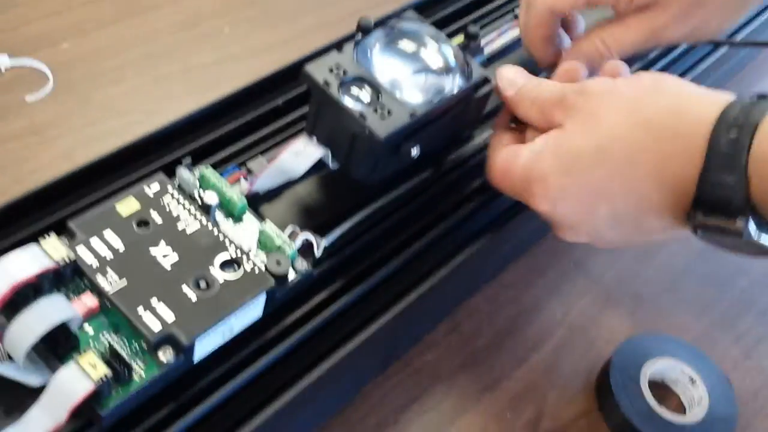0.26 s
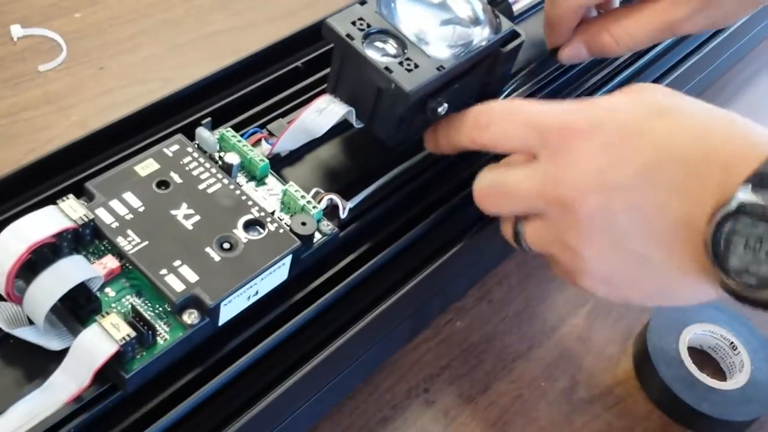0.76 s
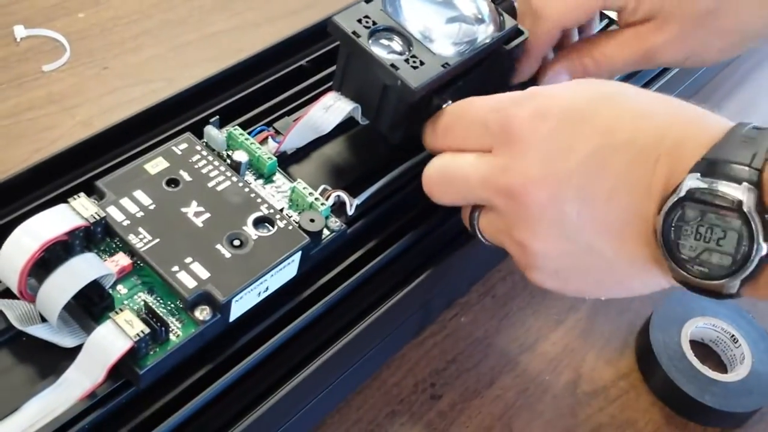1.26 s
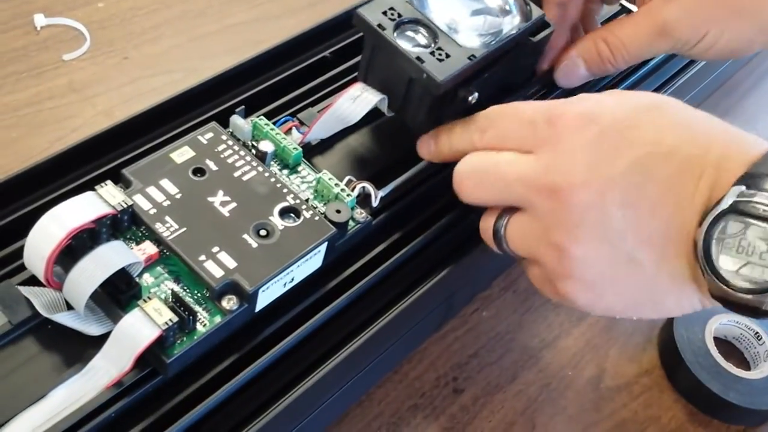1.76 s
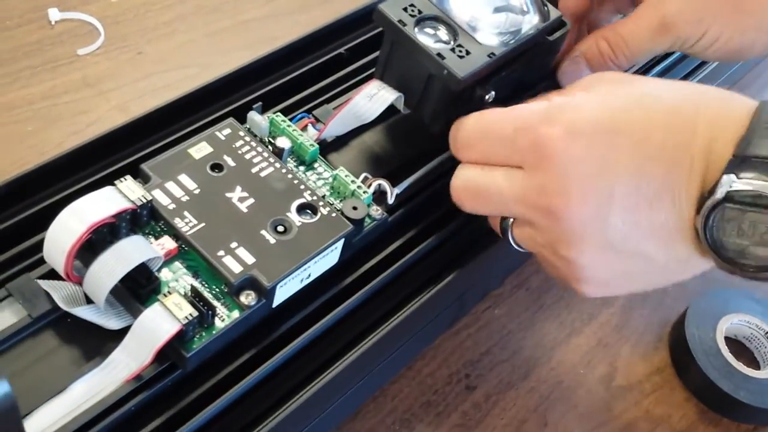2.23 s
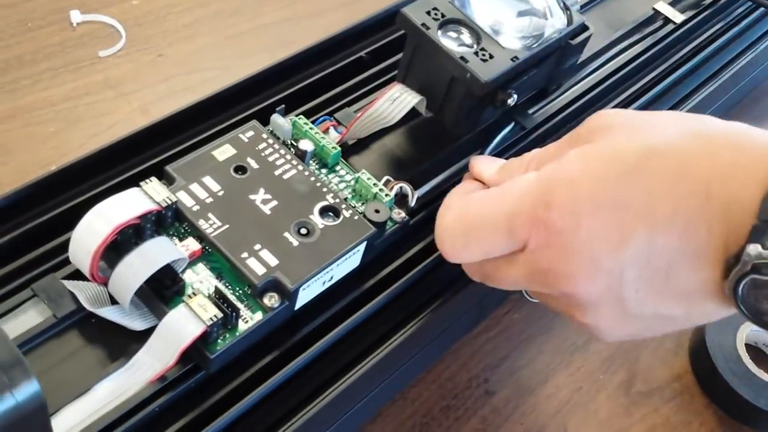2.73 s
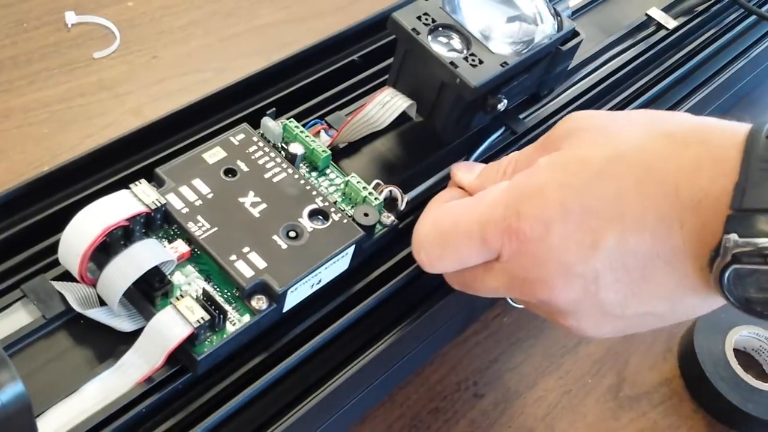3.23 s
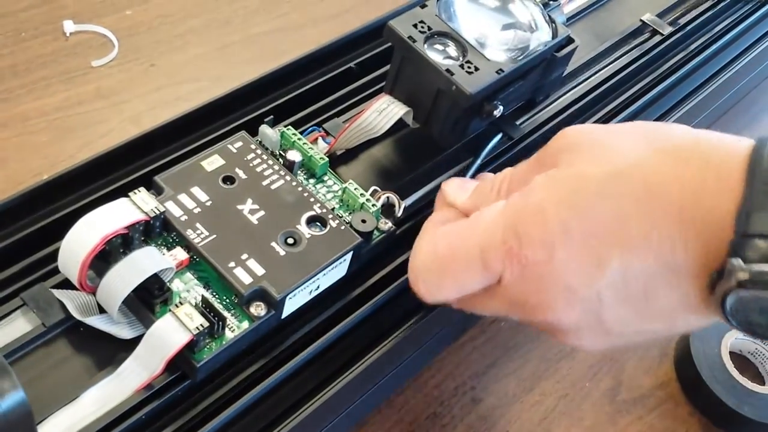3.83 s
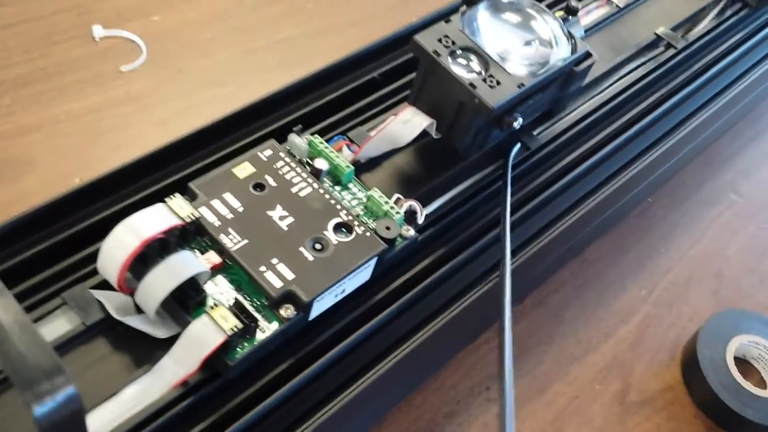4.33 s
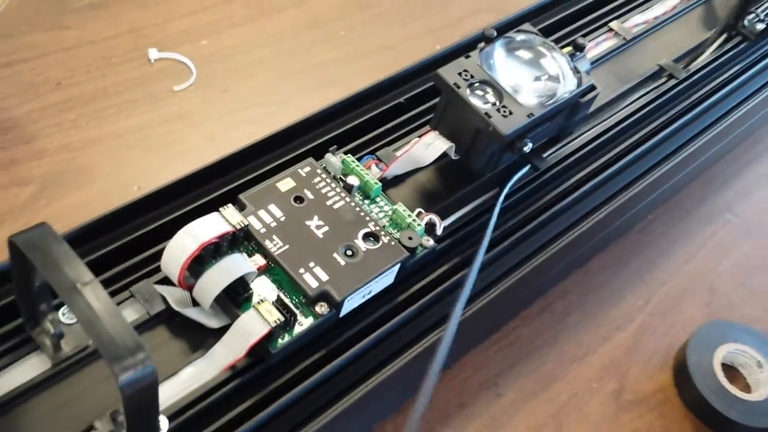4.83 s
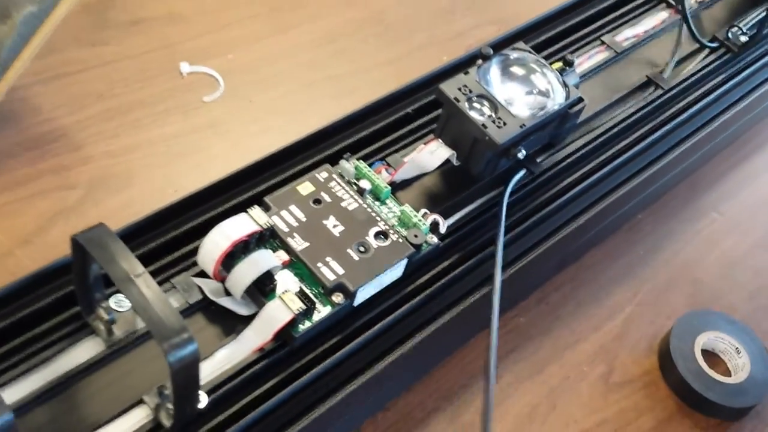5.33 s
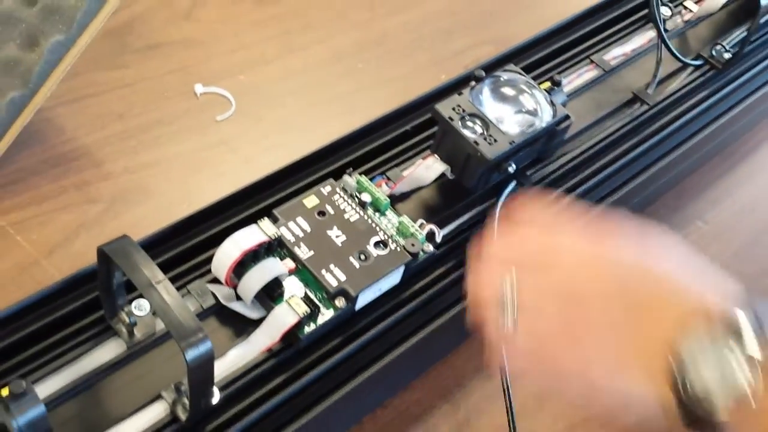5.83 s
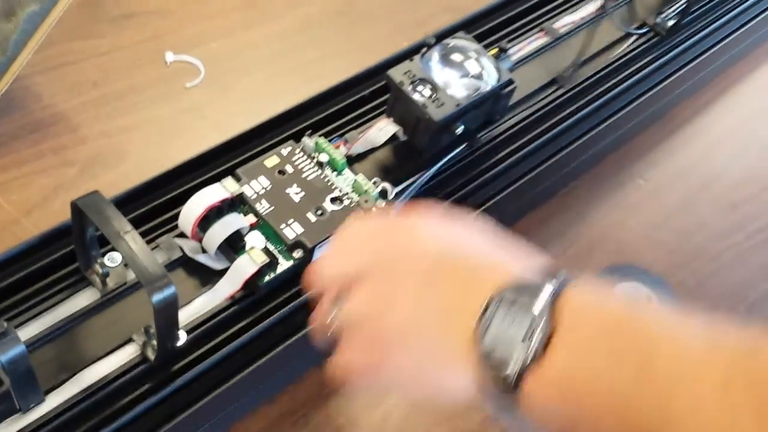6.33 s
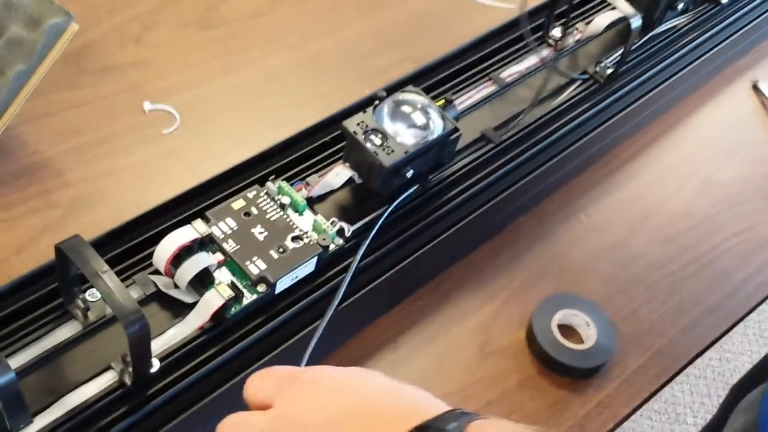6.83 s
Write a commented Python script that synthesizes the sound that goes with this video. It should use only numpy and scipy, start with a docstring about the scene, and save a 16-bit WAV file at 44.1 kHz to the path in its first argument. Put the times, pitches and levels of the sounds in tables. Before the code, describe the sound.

Close in a small room, a thin cable rubs in uneven strokes along a hollow metal channel. Knocks, dull tocks and plastic snaps crowd the first two and a half seconds, peaking in a bright clack. Softer sliding through fingers follows, then ringing knocks near five seconds, a strong scrape, and a hard knock with the cable dragging on the tabletop. Faint mains hum and ventilation stay underneath.

```python
"""Cable fed along an aluminium channel

A thin cable is fed by hand along a long channel on a table: filtered noise and stick-slip clicks follow slow strokes.
Knocks are short noise bursts that ring sine modes of the channel; plastic clips snap and small fittings tock.
The table drums and booms with filtered slips and noise, fingers swish on the jacket.
Mains hum, low ventilation rumble and faint hiss fill the small room."""
import sys
import numpy as np
from scipy import signal
from scipy.io import wavfile

SR = 44100
rng = np.random.default_rng(int(sys.argv[2]) if len(sys.argv) > 2 else 0)


def store_pcm(level_fs):
    """Save levels as 16-bit WAV."""
    pcm = np.round(np.clip(level_fs, -1, 1) * 32767).astype(np.int16)
    wavfile.write(sys.argv[1], SR, np.atleast_2d(pcm).T)


N = 312668
TIME = np.arange(N) / SR

# Pushes and pulls of the cable. Each row: moment of full speed in seconds, speeding up in seconds,
# slowing down in seconds, friction level in dB (each layer trims it), low scrape and hiss in dB against the friction.
STROKES = [(0.0, 0.028, 0.081, -36, 1, -8.5), (0.26, 0.12, 0.03, -54.5, 3, 5),
           (0.44, 0.22, 0.16, -47, -5, -2), (0.608, 0.1, 0.22, -54, 4.5, 1),
           (0.82, 0.13, 0.26, -45, -0.5, -1.5), (1.18, 0.31, 0.3, -56.5, 3.5, 1.5),
           (1.795, 0.1, 0.076, -43.5, -8, 3), (1.93, 0.32, 0.17, -45.5, 5.5, -0.5),
           (2.095, 0.065, 0.035, -49, -16, 0), (2.36, 0.38, 0.5, -61, 7, 5.5),
           (3.41, 0.18, 0.091, -50.5, 0.5, 3.5), (3.56, 0.16, 0.29, -46.5, -3, 2),
           (3.711, 0.081, 0.26, -55, 0.5, 5.5), (4.12, 0.087, 0.07, -61.5, 7, 2.5),
           (4.39, 0.23, 0.15, -51.5, -2.5, 3), (4.6, 0.12, 0.23, -46.5, -3, -2),
           (4.72, 0.1, 0.3, -52, -3, 2.5), (4.96, 0.26, 0.19, -61, 10, 5.5),
           (5.539, 0.034, 0.093, -52, -6, 9), (5.721, 0.19, 0.21, -45, -7, 0.5),
           (5.816, 0.16, 0.096, -37.5, -22, -3), (6.02, 0.86, 0.14, -56, -1, -3),
           (6.36, 0.14, 0.2, -73, 11, 19), (6.56, 0.057, 0.025, -53.5, -1, 8.5),
           (6.73, 0.18, 0.44, -45.5, 2, -2.5), (6.855, 0.036, 0.065, -54, 0, 11),
           (6.965, 0.05, 0.036, -55.5, -16, 13.5), (7.07, 0.065, 0.15, -59.5, -7, 8)]
# Steady creep of the held cable beneath the strokes: friction level in dB, low scrape and hiss in dB against it.
CREEP = (-70.5, 7.7, 6.8)
SPEED_POWER = 2.25   # the rub's amplitude grows as this power of the speed
# Brief flares as the jacket snags: how many per second, size against the rub in dB, t60 in seconds
SNAGS_PER_S, SNAG_DB, SNAG_T60_S = 37, 1, 0.021
# Spectrum of the rub. Each row: frequency in Hz, relative density in dB per Hz.
RUB_COLOUR = [(200, 0.5), (500, -3.5), (750, 4.5), (1100, -4), (1750, 0), (2400, -5.5), (3000, -19.5),
              (3900, -2.5), (4600, -15), (5400, -14), (6400, -5.5), (8000, -14), (10500, -27),
              (14500, -29.5)]
# Damped resonances of the groove the cable runs in. Each row: frequency in Hz, width in Hz, relative level in dB.
GROOVE_MODES = [(860, 98, -7), (973, 39, 3.5), (1265, 26, 4), (1670, 55, 2), (1780, 87, -2),
                (4200, 160, -17), (6140, 160, -9.5)]
# Contact of the cable with a rail's edge. Each row: time in seconds, share of the friction from 0 to 1.
EDGE_CONTACT = [(0.1, 0.03), (0.4, 0.69), (2.35, 0.37), (2.5, 0.3)]
# Resonances of that edge. Each row: frequency in Hz, width in Hz, relative level in dB.
EDGE_MODES = [(4080, 530, -0.5), (4670, 190, 3)]
# Cable drawn through the fingers. Each row: time in seconds, share of the friction from 0 to 1.
FINGER_GRIP = [(3.25, 0.6), (3.4, 1), (4.7, 1), (4.85, 0.6), (5.5, 0.05), (5.8, 0), (6.6, 0.7)]
# Spectrum of the finger swish. Each row: frequency in Hz, relative density in dB per Hz.
FINGER_COLOUR = [(850, 2), (1200, -3.5), (1600, -10), (2800, -34), (6400, -13.5), (11000, -27),
                 (14500, -23.5)]

# Blows on the channel. Each row: start in seconds, level in dB before the layer's trim, thud in dB,
# brightness in dB, t60 of the burst in seconds, free ringing in dB against the level, place where it lands.
KNOCKS = [(0.003, -33, 3, -5, 0.036, 5, "lamp"), (0.122, -41.5, 15, 2.5, 0.11, -23, "lamp"),
          (0.216, -48.5, 15, -4.5, 0.25, 3, "lamp"), (0.368, -60, 26, 24.5, 0.14, -8, "lamp"),
          (0.498, -38, 11.5, 1, 0.08, -15, "lamp"), (0.602, -43, 13, 3, 0.1, -8, "middle"),
          (0.722, -41, 20.5, -3, 0.13, -25, "middle"), (0.783, -44, 8, -11, 0.08, -10, "middle"),
          (0.836, -33.5, 14.5, -7, 0.11, -12, "middle"), (1.084, -40.5, -22, 0, 0.088, -16, "lamp"),
          (1.117, -62, 34, -16, 0.061, -22, "middle"), (1.24, -30.5, 8, -4.5, 0.13, -11, "middle"),
          (1.252, -29.5, 3.5, -2.5, 0.082, -23, "middle"), (1.327, -43, 27.5, -20, 0.1, -25, "middle"),
          (1.471, -31.5, 6, 4, 0.064, -7, "lamp"), (1.695, -42, 12, 5.5, 0.046, -10, "middle"),
          (1.986, -35, 13.5, -9, 0.053, -8, "middle"), (2.185, -28, 8.5, 1.5, 0.12, 5.5, "middle"),
          (2.4539, -19.5, 11, 9.5, 0.099, -2, "lamp"), (2.567, -26, -0.5, -5.5, 0.048, -2.5, "lamp"),
          (2.958, -49, 5, 0.5, 0.092, -12, "middle"), (3.103, -49.5, 10, 1.5, 0.29, -19, "middle"),
          (3.317, -33, 0, -10.5, 0.037, -21, "middle"), (3.684, -43, 18.5, 3, 0.091, -19, "middle"),
          (3.883, -52, 8, 6, 0.035, -17, "middle"), (4.7655, -24, -6.5, -17.5, 0.08, -7, "lamp"),
          (4.862, -42.5, -12, 0, 0.097, 10, "end"), (4.967, -22, 0.5, -13, 0.11, -2.5, "end"),
          (4.978, -31.5, 9, -9, 0.1, -25, "end"), (5.038, -43, 13, 1, 0.16, 10.5, "end"),
          (5.388, -34, 8, 5, 0.1, 9, "end"), (5.397, -33.5, 5, -0.5, 0.21, 5.5, "end"),
          (5.437, -42.5, 13.5, 3, 0.2, 3, "end"), (5.492, -43.5, 10, 7.5, 0.087, 0, "end"),
          (6.03, -35, 3.5, -8, 0.058, -15, "end"), (6.135, -51.5, 11, 6, 0.14, -16, "end"),
          (6.524, -50.5, 0, -1, 0.24, 17.5, "graze"), (6.6088, -15.5, -2.5, -17, 0.061, -14, "graze"),
          (6.616, -25, 9.5, -13, 0.1, -28, "middle"), (6.644, -43, 5, -0.5, 0.08, 6.5, "graze"),
          (6.709, -30.5, -8, -21, 0.08, 1, "graze"), (6.773, -32, 1, -23, 0.051, 3.5, "graze"),
          (6.94, -56, -5, 6, 0.1, 13, "graze"), (6.969, -54, -6, 3, 0.073, 12, "graze")]
# Names of the places: beside the lamp, mid-channel, at the far end, the cable grazing a rail.
PLACES = ["lamp", "middle", "end", "graze"]
# Spectrum of a knock. Each row: frequency in Hz, relative density in dB per Hz.
KNOCK_COLOUR = [(200, -16), (450, -12), (600, -12), (730, -3.5), (1000, 1), (1500, 4.5), (2600, -2.5),
                (2950, -10.5), (3900, -4.5), (4400, -9.5), (6300, -8.5), (7700, -16.5), (10000, -23.5),
                (14500, -37)]
# Free modes of the channel. Each row: frequency in Hz, t60 in seconds, then relative level in dB
# when struck beside the lamp, in the middle, at the far end, and when the cable grazes a rail.
RAIL_MODES = [(735, .12, -2, -4, -20, -30), (862, .3, -14, -13, -14, -22), (1010, .15, -6, -3, -13, -20),
              (1276, .13, -7, -6, -6, -18), (1482, .22, -8, -9, -9, -14), (1587, .28, -14, 0, -6, -12),
              (1615, .55, -28, -22, -9, -5), (1665, .52, -7, -18, -13, -20), (1725, .16, -11, 1, -9, -16),
              (1834, .48, -14, -20, -11, -13), (1986, .17, -12, -3, -12, -18),
              (2210, .36, -11, -19, -14, -9), (2374, .13, -8, -6, -10, -20), (2530, .14, -3, -7, -13, -22),
              (2600, .16, -6, -14, -6, -20), (3128, .25, -26, -22, -16, -26),
              (3321, .25, -24, -24, -21, -13), (3868, .2, -16, -15, -15, -24),
              (3988, .22, -14, -24, -20, -24), (4145, .24, -11, -19, -21, -26),
              (4565, .55, -29, -33, -17, -10), (4657, .65, -20.5, -36, -23, -21),
              (4943, .28, -15, -26, -16, -21), (5615, .38, -24, -35, -22, -18),
              (6250, .16, -13, -22, -20, -24), (7484, .3, -21, -31, -30, -30)]
# Weaker neighbours around each mode: spread in pitch as a share, relative level in dB, share of its t60
NEIGHBOUR_SPREAD, NEIGHBOUR_DB, NEIGHBOUR_T60 = 0.0503, -17, 0.98
# Blows that catch a small damped fitting. Each row: start in seconds, pitch in Hz, level in dB, t60 in seconds.
TOCKS = [(.724, 633, -38, 0.081), (1.252, 1037, -29.5, 0.073), (2.456, 2485, -24, 0.098),
         (2.57, 930, -32, 0.052), (2.696, 758, -44.5, 0.1), (4.769, 1298, -29.5, 0.09),
         (4.968, 1437, -24, 0.058), (5.388, 2590, -34, 0.19)]
TOCK_LOWER_RATIO, TOCK_LOWER_DB = .77, -8   # second mode: share of the pitch, relative level in dB
# Snaps of plastic clips. Each row: start in seconds, then lower and upper mode drive level in dB.
CLIP_SNAPS = [(.004, -33.5, -34), (0.122, -41, -43), (0.501, -42, -61), (1.084, -47, -46.5),
              (1.253, -27.5, -29.5), (1.4703, -30.5, -39), (1.55, -47.5, -42.5), (4.7678, -42, -35.5),
              (4.9665, -39.5, -37), (5.387, -36, -50), (5.436, -31, -40), (5.491, -34, -42),
              (5.947, -60, -47), (6.608, -40, -36)]
# Modes of a clip. Each row: frequency in Hz, width of the first filter pass in Hz.
CLIP_MODES = [(3950, 810), (6550, 750)]

# Slack cable dragging over the table top. Each row: time in seconds, level in dB.
DRAG = [(6.61, -39), (6.63, -36), (6.7, -44.5), (6.79, -44.5), (6.9, -42.5), (6.98, -58)]
# Resonances of the table top. Each row: frequency in Hz, width in Hz, relative level in dB.
TABLE_MODES = [(370, 90, 5.5), (670, 74, 3), (863, 44, 10.5), (1036, 56, 6), (1290, 140, 0),
               (1770, 540, -4)]
# Spectrum of the table under the channel. Each row: frequency in Hz, relative density in dB per Hz.
BOOM_COLOUR = [(80, -19), (120, 3.5), (160, 4), (200, -2.5)]

# Slow swell of the room tone. Each row: time in seconds, hum level in dB, rumble level in dB before its trim.
ROOM_SWELL = [(0.0, -47, -54), (2.43, -49.5, -53.5), (3.08, -52.5, -59), (4.93, -49, -53.5),
              (5.98, -47, -60), (7.09, -48, -56.5)]
# Spectrum of the ventilation rumble. Each row: frequency in Hz, relative density in dB per Hz.
RUMBLE_COLOUR = [(25, -20), (38, -4), (55, -9), (80, -7), (100, -8), (130, 1.5), (170, 0), (220, -13.5),
                 (300, -37), (450, -30)]
# Spectrum of the faint hiss. Each row: frequency in Hz, relative density in dB per Hz.
AIR_COLOUR = [(150, -30), (250, -1), (533, -9), (1980, -17), (2160, -8.5), (3130, -33), (6560, -17.5),
              (8740, -29), (13100, -22), (14000, -33)]
HUM_HZ, OVERTONE_DB, AIR_DB = 59, -13.5, -62.5
ROOM_T60_S, CUTOFF_HZ = 0.54, 14000


def from_db(db):
    """Decibels to gain."""
    return 10 ** (np.asarray(db) / 20)


def rms_one(x):
    """Scale to unit rms."""
    return x / np.sqrt(np.mean(x ** 2) + 1e-20)


def in_time(rows):
    """Each column of a curve at every sample."""
    s, *columns = np.transpose(rows)
    return [np.interp(TIME, s, column) for column in columns]


def at_hz(points, hz):
    """Read a spectrum on a log-frequency axis."""
    points = np.array(points)
    return np.interp(np.log(hz), np.log(points[:, 0]), points[:, 1])


def dying(t, t60):
    """Fall by 60 dB in t60."""
    return np.exp(-np.log(1000) * t / t60)


def drift(rate_hz, size=N):
    """Slow random wander of unit rms: noise through two equal one-pole lowpasses."""
    r = np.exp(-2 * np.pi * rate_hz / SR)
    noise = rng.standard_normal(size + SR // 4)   # the extra start lets the filter settle
    return rms_one(signal.lfilter([1], [1, -2 * r, r * r], noise)[-size:])


def bands(colour, count):
    """Noise split into bands that share unit power as the colour says: (centre Hz, band)."""
    edges = np.geomspace(colour[0][0], min(colour[-1][0], SR / 2 - 1), count + 1)
    centres = np.sqrt(edges[1:] * edges[:-1])
    power = from_db(at_hz(colour, centres)) ** 2 * np.diff(edges)
    white = rng.standard_normal((2, N))   # adjacent bands draw on different noise
    for k, hz in enumerate(centres):
        bandpass = signal.butter(2, edges[k:k + 2], "band", fs=SR, output="sos")
        band = signal.sosfilt(bandpass, white[k % 2])
        yield hz, rms_one(band) * np.sqrt(power[k] / power.sum())


def coloured_noise(colour, count):
    """All bands of a colour together."""
    return sum(band for _, band in bands(colour, count))


def contact_db(hz, low_db, high_db):
    """A heavy contact lifts the hollow low middle of the channel, a hard one the highs."""
    hollow = at_hz([(200, .3), (400, .5), (680, 1), (1250, 0)], hz)
    hard = at_hz([(1450, 0), (3100, 1)], hz)
    return low_db * hollow + high_db * hard


def resonance(drive, hz, width_hz):
    """A broad resonance with gain 1 at its top."""
    r = np.exp(-np.pi * width_hz / SR)
    zeros = np.array([1, 0, -1]) * (1 - r * r) / 2
    poles = [1, -2 * r * np.cos(2 * np.pi * hz / SR), r * r]
    return signal.lfilter(zeros, poles, drive + 1e-18)


def ring(drive, hz, t60):
    """A unit click sets a sine of height 1 ringing."""
    r, w = dying(1 / SR, t60), 2 * np.pi * hz / SR
    return signal.lfilter([0, np.sin(w)], [1, -2 * r * np.cos(w), r * r], drive + 1e-18)


def clicks(times, sizes):
    """One click of the given size at each time."""
    out = np.zeros(N)
    out[np.clip(np.round(times * SR), 0, N - 1).astype(int)] = sizes
    return out


def slips(per_s, spread_db):
    """Random stick-slip impulses of uneven size and either sign, at unit rms."""
    excess = np.minimum(rng.exponential(1, N), 4)   # caps the rare giants
    sizes = from_db(spread_db * excess) * rng.choice([-1, 1], N)
    return rms_one(sizes * (rng.random(N) < per_s / SR))


def snags():
    """Gain on the power of the rub: brief random flares, mean 1."""
    caught = (rng.random(N) < SNAGS_PER_S / SR) * rng.exponential(1, N) * from_db(SNAG_DB) ** 2
    gain = 1 + signal.lfilter([1], [1, -dying(1 / SR, SNAG_T60_S) ** 2], caught + 1e-18)
    return gain / gain.mean()


def friction():
    """Strokes speed up and slow down in arches, louder when faster: level, relative scrape and hiss in dB."""
    def three_gains(level_db, scrape_db, hiss_db):
        return from_db([[level_db], [level_db + scrape_db], [level_db + hiss_db]])

    power = three_gains(*CREEP) ** 2 * np.ones(N)
    for peak_s, rise_s, fall_s, *levels_db in STROKES:
        progress = np.interp(TIME, [peak_s - rise_s, peak_s, peak_s + fall_s], [0, 1, 0])
        moving = progress > 0
        speed = np.sin(np.pi / 2 * progress[moving])
        power[:, moving] += (three_gains(*levels_db) * speed ** SPEED_POWER) ** 2
    middle_db, low_db, high_db = 10 * np.log10(power * snags())
    return middle_db, low_db - middle_db, high_db - middle_db


def sliding_cable(rubbing, level_db, grain_db, grain_hz, judder_db, judder_hz, patchy_db,
                  ring_db, body_db, body_t60):
    """The jacket sticks and slips in tiny grains; the channel colours the rub and sings along faintly."""
    friction_db, scrape_db, hiss_db = rubbing
    grip = rms_one(from_db(grain_db * drift(grain_hz) + judder_db * drift(judder_hz)))
    rub = np.zeros(N)
    for hz, band in bands(RUB_COLOUR, count=26):
        # the moving contact favours one low band, then another
        shifting_db = patchy_db * drift(judder_hz) if hz < 2700 else 0
        rub += band * from_db(contact_db(hz, scrape_db, hiss_db) + shifting_db)
    rub *= grip * from_db(friction_db + level_db)
    singing = np.zeros(N)
    for k, (hz, t60, *place_db) in enumerate(RAIL_MODES):
        width_hz = np.log(1000) / (np.pi * t60)
        singing += (-1) ** k * from_db(np.mean(place_db)) * resonance(rub, hz, width_hz)
    # dense reflections inside the channel leave fixed ripples in the spectrum
    echoes = rng.standard_normal(SR // 5) * dying(TIME[:SR // 5], body_t60)
    body = signal.fftconvolve(rub, echoes / np.linalg.norm(echoes))[:N]
    return rub + from_db(body_db) * body + from_db(ring_db) * singing


def groove_scrape(rubbing, level_db, slips_per_s, spread_db, wander_db, wander_hz):
    """Uneven slips of the jacket ring the groove; its resonances take turns as the contact travels."""
    friction_db, scrape_db, hiss_db = rubbing
    drive = slips(slips_per_s, spread_db) * from_db(friction_db + level_db)
    out = np.zeros(N)
    for k, (hz, width_hz, db) in enumerate(GROOVE_MODES):
        mode_db = db + contact_db(hz, scrape_db, hiss_db) + wander_db * drift(wander_hz)
        out += (-1) ** k * resonance(drive * from_db(mode_db), hz, width_hz)
    return out


def grit(rubbing, level_db, ticks_per_s, spread_db, scatter_db, width_hz):
    """Uneven ticks of the jacket on small burrs ring the groove very briefly, each with its own colour."""
    friction_db, _, _ = rubbing
    drive = slips(ticks_per_s, spread_db) * from_db(friction_db + level_db)
    out = np.zeros(N)
    for k, (hz, _, db) in enumerate(GROOVE_MODES):
        tick_db = db + scatter_db * rng.standard_normal(N)
        out += (-1) ** k * resonance(drive * from_db(tick_db), hz, width_hz)
    return out


def edge_rasp(rubbing, level_db, slips_per_s, spread_db):
    """Fine slips of the jacket over a rail's edge raise a bright metallic rasp."""
    friction_db, _, hiss_db = rubbing
    share, = in_time(EDGE_CONTACT)
    drive = slips(slips_per_s, spread_db)
    metal = np.zeros(N)
    for hz, width_hz, db in EDGE_MODES:
        metal += from_db(db) * resonance(resonance(drive, hz, width_hz), hz, 2 * width_hz)
    return share * from_db(friction_db + hiss_db + level_db) * rms_one(metal)


def finger_slide(rubbing, level_db):
    """The jacket slipping between the fingertips adds a hollow, airy swish that follows the friction."""
    friction_db, _, hiss_db = rubbing
    share, = in_time(FINGER_GRIP)
    swish = sum(band * from_db(contact_db(hz, 0, hiss_db)) for hz, band in bands(FINGER_COLOUR, count=16))
    return share * from_db(friction_db + level_db) * swish


def clatter(level_db, rise_s, chatter_db, chatter_hz, tail_db, tail_fall_db):
    """Blows wake the crowded, damped modes of rails and fittings; loose parts chatter, the room answers."""
    t = TIME[:SR * 3 // 5]
    blows = []
    for _, _, _, _, t60, *_ in KNOCKS:
        chatter = rms_one(from_db(chatter_db * drift(chatter_hz, size=len(t))))
        blows.append(((1 - np.exp(-t / rise_s)) * dying(t, t60) * chatter) ** 2)
    tail = ((1 - np.exp(-t / 0.0046)) * dying(t, ROOM_T60_S)) ** 2
    out = np.zeros(N)
    for hz, band in bands(KNOCK_COLOUR, count=30):
        power = np.zeros(N + len(t))
        # the room returns less of the treble
        wet = from_db(tail_db - tail_fall_db * np.log2(hz / 1000)) ** 2
        for (start_s, db, thud_db, bright_db, *_), blow in zip(KNOCKS, blows):
            start = round(start_s * SR)
            strength = from_db(db + contact_db(hz, thud_db, bright_db)) ** 2
            power[start:start + len(t)] += strength * (blow + wet * tail)
        out += band * np.sqrt(power[:N])
    return from_db(level_db) * out


def rail_ring(level_db, scatter_db, count):
    """The blows ring free modes of the channel in clusters; where a blow lands decides which modes sing."""
    *columns, places = zip(*KNOCKS)
    start_s, db, thud_db, bright_db, _, ring_db = np.array(columns)
    spot = [PLACES.index(place) for place in places]
    out = np.zeros(N)
    for hz, mode_t60, *place_db in RAIL_MODES:
        strike_db = db + ring_db + np.array(place_db)[spot] + contact_db(hz, thud_db, bright_db)
        partials = [(hz, 0, mode_t60)]
        for offset in rng.uniform(-1.004, 1, count):
            partials.append((hz * (1 + NEIGHBOUR_SPREAD * offset), NEIGHBOUR_DB, NEIGHBOUR_T60 * mode_t60))
        for partial_hz, partial_db, partial_t60 in partials:
            # bending waves reach the ends at different moments
            travel_s = rng.uniform(0, 0.001977, len(start_s))
            scatter = scatter_db * rng.standard_normal(len(start_s))
            strength = from_db(strike_db + partial_db + scatter)
            out += ring(clicks(start_s + travel_s, strength), partial_hz, partial_t60)
    return from_db(level_db) * out


def tocks():
    """A struck fitting rings two quickly dying modes."""
    t = TIME[:SR // 5]
    out = np.zeros(N + len(t))
    for start_s, hz, db, t60 in TOCKS:
        phase, start = 2 * np.pi * hz * t, round(start_s * SR)
        tock = np.sin(phase) + from_db(TOCK_LOWER_DB) * np.sin(TOCK_LOWER_RATIO * phase)
        out[start:start + len(t)] += from_db(db) * dying(t, t60) * tock
    return out[:N]


def clip_snaps(t60):
    """A snap is a short rattle that rings the two modes of a small plastic clip."""
    t = TIME[:SR // 10]
    out = np.zeros(N)
    for k, (hz, width_hz) in enumerate(CLIP_MODES):
        rattle = np.zeros(N + len(t))
        for start_s, *levels_db in CLIP_SNAPS:
            start = round(start_s * SR)
            grains = rms_one(resonance(rng.standard_normal(len(t)), hz, width_hz))
            rattle[start:start + len(t)] += from_db(levels_db[k]) * grains * dying(t, t60)
        out += resonance(rattle[:N], hz, 2 * width_hz)   # a second pass steepens the flanks of the mode
    return out


def table_drag(slips_per_s, spread_db):
    """Coarse slips of the cable over wood drum on the table top."""
    drag_db, = in_time(DRAG)
    touching = (TIME > DRAG[0][0]) & (TIME < DRAG[-1][0])
    drive = slips(slips_per_s, spread_db)
    wood = np.zeros(N)
    for k, (hz, width_hz, db) in enumerate(TABLE_MODES):
        wood += (-1) ** k * from_db(db) * resonance(drive, hz, width_hz)
    damping = signal.butter(2, 2600, fs=SR, output="sos")   # wood and soft jacket swallow the treble
    return from_db(drag_db) * touching * rms_one(signal.sosfilt(damping, wood))


def table_boom(rubbing, rub_db):
    """Heavy scrapes pass through the channel into the table, which booms softly."""
    friction_db, scrape_db, _ = rubbing
    return from_db(friction_db + scrape_db + rub_db) * coloured_noise(BOOM_COLOUR, count=5)


def room_tone(rumble_trim_db, waver_hz):
    """A slightly wavering mains hum with one overtone, ventilation rumble and faint hiss."""
    hum_db, rumble_db = in_time(ROOM_SWELL)
    phase = 2 * np.pi * np.cumsum(HUM_HZ + waver_hz * drift(1.14)) / SR
    tone = np.sin(phase) + from_db(OVERTONE_DB) * np.sin(2 * phase)
    hum = np.sqrt(2) * from_db(hum_db) * tone   # the root makes the level an rms
    rumble = from_db(rumble_db + rumble_trim_db) * coloured_noise(RUMBLE_COLOUR, count=12)
    air = from_db(AIR_DB) * coloured_noise(AIR_COLOUR, count=12)
    return hum + rumble + air


def scene():
    """The sliding cable, knocks and snaps over the table and the room tone."""
    rubbing = friction()
    cable = sliding_cable(rubbing, level_db=-4.0, grain_db=0.1, grain_hz=410, judder_db=1.57, judder_hz=35.7,
                          patchy_db=1.2, ring_db=6, body_db=0.0, body_t60=0.27)
    cable += groove_scrape(rubbing, level_db=9.5, slips_per_s=400, spread_db=3.5, wander_db=3.5, wander_hz=4.6)
    cable += grit(rubbing, level_db=1, ticks_per_s=110, spread_db=3.5, scatter_db=3, width_hz=300)
    cable += edge_rasp(rubbing, level_db=-2.5, slips_per_s=2300, spread_db=4.0)
    fingers = finger_slide(rubbing, level_db=-5)
    knocks = clatter(level_db=-1.0, rise_s=0.001, chatter_db=1.0, chatter_hz=215, tail_db=-16.5, tail_fall_db=3.5)
    knocks += rail_ring(level_db=-9.0, scatter_db=1.0, count=3)
    fittings = tocks() + clip_snaps(t60=0.032)
    table = table_drag(slips_per_s=110, spread_db=0.5) + table_boom(rubbing, rub_db=-14.0)
    room = room_tone(rumble_trim_db=3.0, waver_hz=0.38)
    return (cable + fingers + knocks + fittings + table + room)[None]


def record(dry):
    """The top is cut steeply by an elliptic lowpass."""
    return signal.sosfilt(signal.ellip(10, .2, 80, CUTOFF_HZ, fs=SR, output="sos"), dry)


dry = scene()
out = record(dry)
store_pcm(out)
```